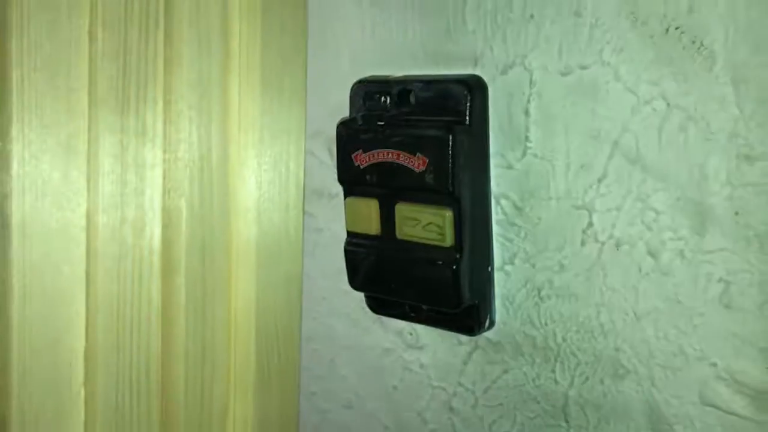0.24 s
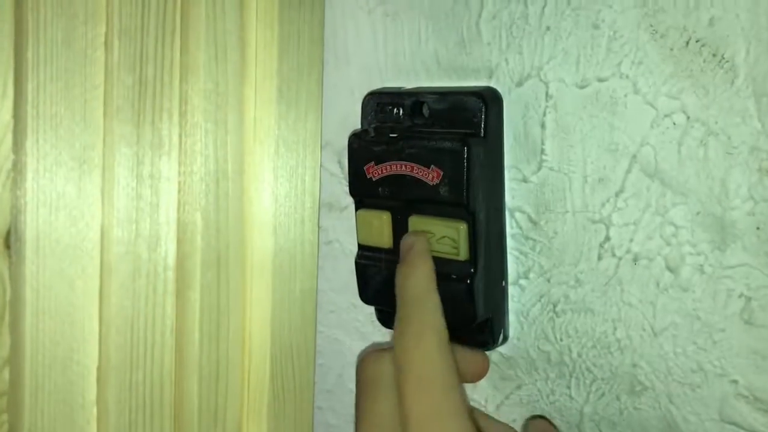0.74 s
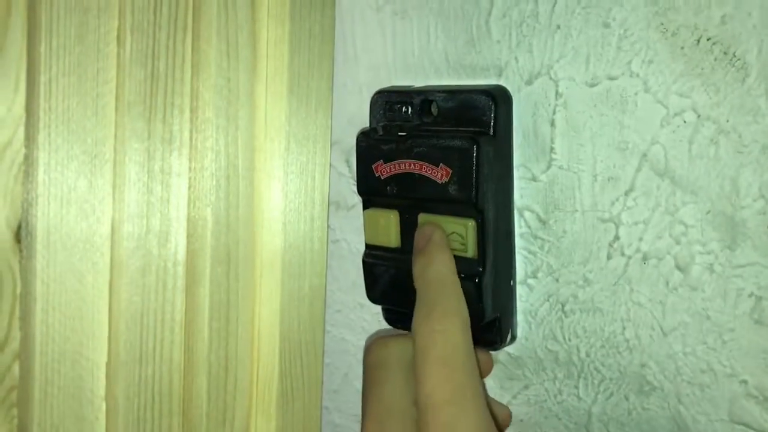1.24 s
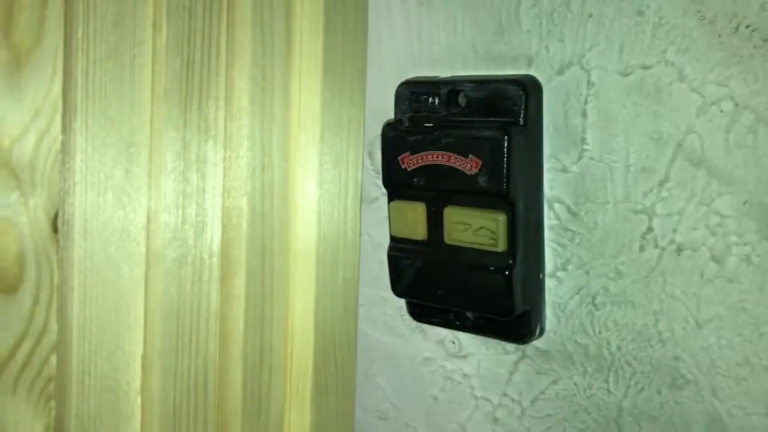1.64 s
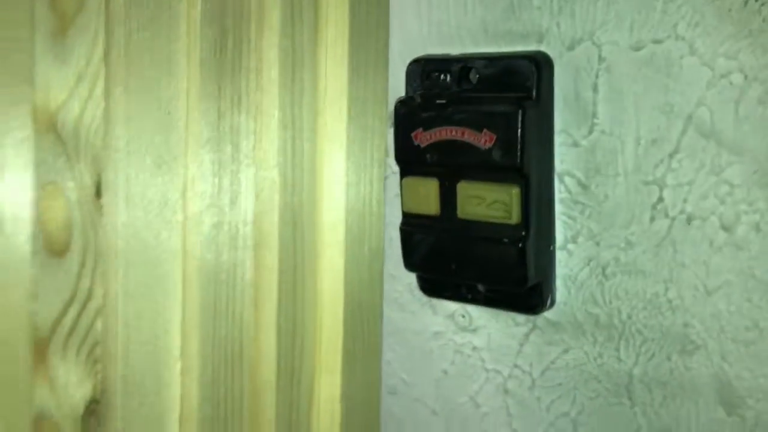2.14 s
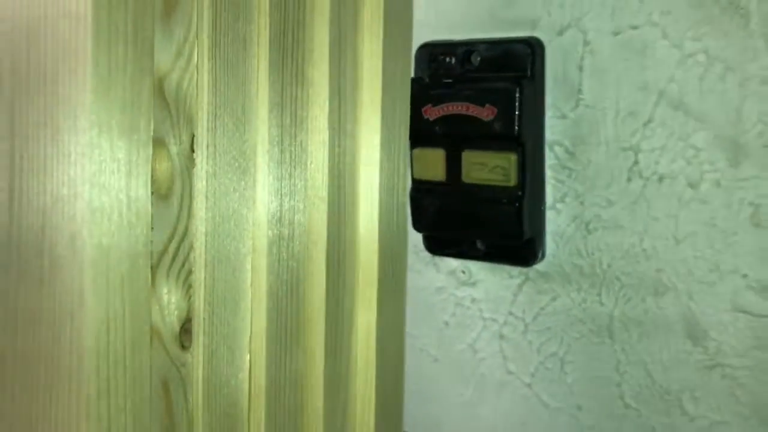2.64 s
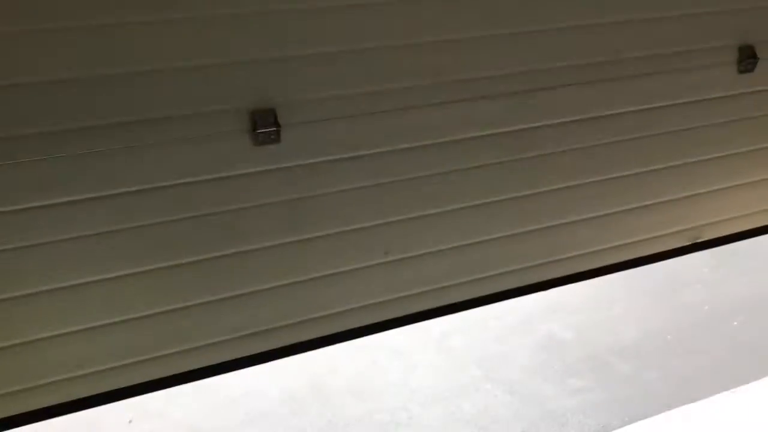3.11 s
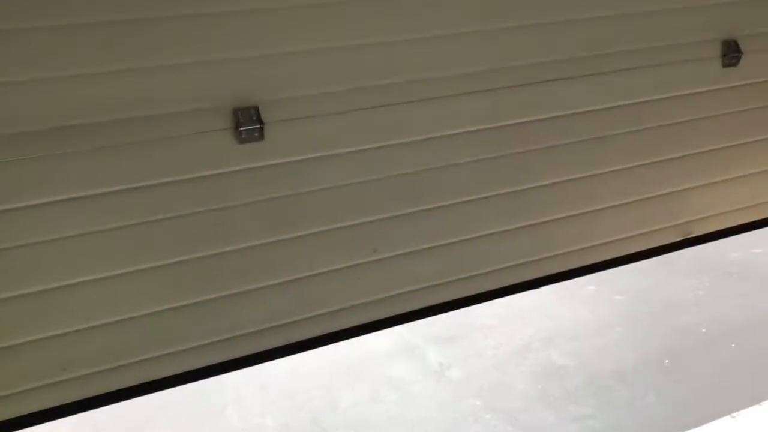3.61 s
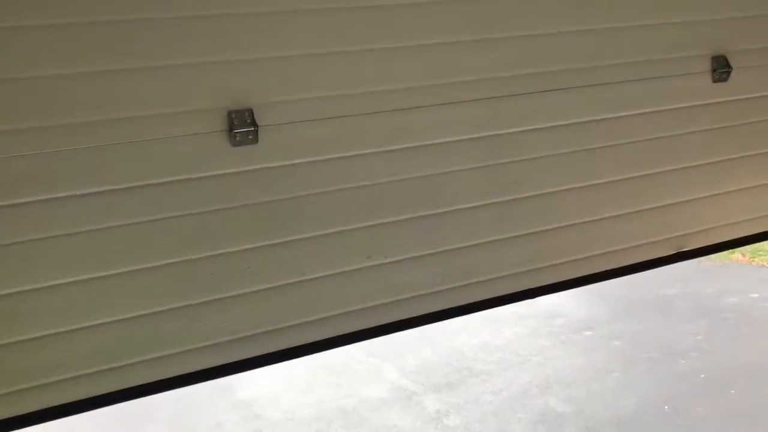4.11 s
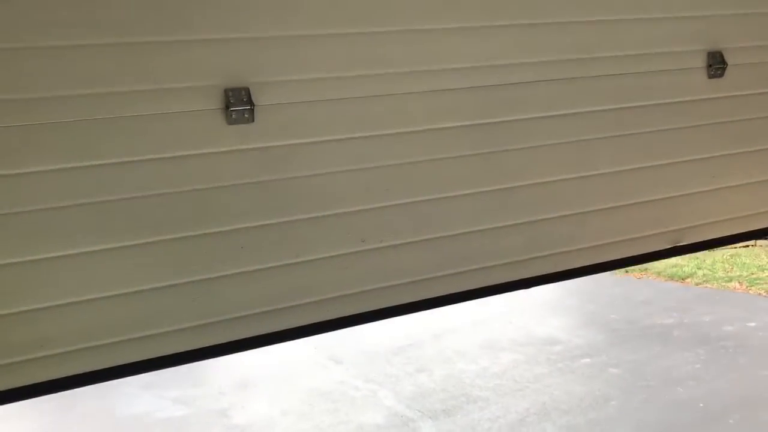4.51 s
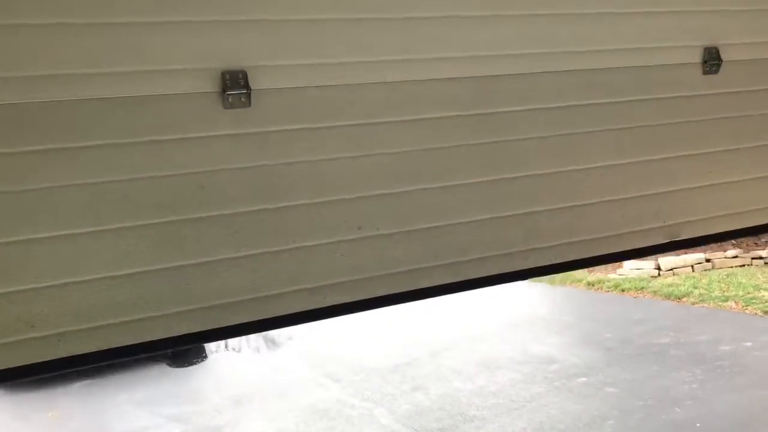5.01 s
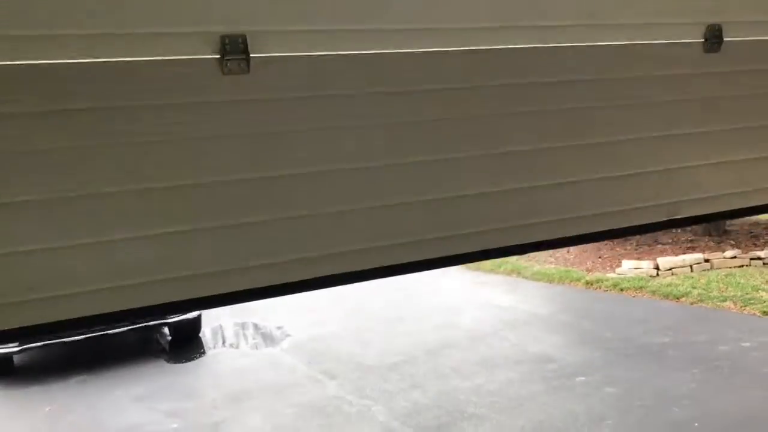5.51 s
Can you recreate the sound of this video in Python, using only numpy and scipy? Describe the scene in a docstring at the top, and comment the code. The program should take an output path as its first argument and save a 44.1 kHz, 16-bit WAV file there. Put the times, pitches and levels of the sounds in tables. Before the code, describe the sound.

In a quiet garage, a hand and clothing rustle faintly close to the microphone. A plastic wall button clicks and an electric opener starts humming. The door jerks into motion with dull blows and ringing metal clanks, then rumbles along its track while the chain slaps. Its hollow drone slowly grows as panels knock, the frame thumps and hinges clack, echoing off the bare walls.

```python
"""In a quiet, bare garage a hand settles on the wall; cloth brushes and small ticks sound close by.
A wall button clicks and an electric opener starts, its motor humming at twice the mains frequency.
The sectional door jerks, its rollers rumble along the track, and its hollow drone swells, settles and
grows steadily louder. The drive clanks, sets the steel rail ringing and slaps as it takes the load.
Then panels knock, the frame thumps and hinges clack, each impact reverberating in the room."""
import sys
import numpy as np
from scipy import signal
from scipy.io import wavfile

SR = 44100
rng = np.random.default_rng(int(sys.argv[2]) if len(sys.argv) > 2 else 0)


def transcribe(u):
    """Save the signal u as a 16-bit wav file named by the first command-line argument.

    u: samples, shape (n,) or (channels, n), limited to [-1, 1]; the rate is SR.
    q: integer samples, one column per channel.
    """
    v = np.clip(np.atleast_2d(u).T, -1, 1)
    q = np.round(v * 32767).astype(np.int16)
    wavfile.write(sys.argv[1], SR, q)


N = 253575
TIME = np.arange(N) / SR
START_S = 1.365  # the motor switches on

# modes of the steel rail: f/Hz, level/dB, T60/s
RAIL_MODES = [(2799, -10, .45), (3094, -6, .5), (3212, -9, .45), (3558, -7, .4), (3682, -9, .4),
              (5440, -6, .25), (5497, -3, .4), (5555, -4, .25), (6008, -7, .25), (9975, -7, .4),
              (10318, -6, .4), (10611, -5, .4), (10853, -5, .4), (11035, -3, .4), (11613, -2, .4),
              (11700, -4, .35), (11970, -5, .4), (12668, -6, .35)]
# jolts as the door leaves the floor and as sections tip over: t/s, level/dB
DOOR_JOLTS = [(1.52, -37), (2.3, -48), (4.28, -57)]


def amp(db):
    """Amplitude ratio of a level in decibels."""
    return 10 ** (np.asarray(db) / 20)


def unit(x):
    """Normalisation to an rms of 1."""
    return x / np.sqrt(np.mean(x ** 2) + 1e-20)


def since(s):
    """Time elapsed since s; zero before it."""
    return np.maximum(TIME - s, 0)


def add(mix, s, sound):
    """Superposition of a sound that begins at time s."""
    part = mix[max(round(s * SR), 0):][:len(sound)]
    part += sound[:len(part)]


def log_interp(points, hz):
    """Interpolation on a logarithmic frequency axis."""
    f, value = np.transpose(points)
    return np.interp(np.log(hz + 1), np.log(f + 1), value)


def colour(x, spectrum, tilt_db=0, size=8192):
    """Minimum-phase filtering by a spectrum, tilted by tilt_db per octave about 2 kHz."""
    hz = abs(np.fft.fftfreq(size, 1 / SR))
    db = log_interp(spectrum, hz) + tilt_db * np.log2(np.maximum(hz, 200) / 2000)
    log_response = np.conj(signal.hilbert(np.log(amp(db))))
    taps = np.fft.ifft(np.exp(log_response)).real
    return signal.fftconvolve(x, taps[:size // 2])[:len(x)]


def noise(spectrum):
    """Gaussian noise of rms 1 with the given spectral shape."""
    return unit(colour(rng.standard_normal(N), spectrum))


def drift(rate_hz, oversample=8):
    """Random modulation of rms 1, band-limited to rate_hz."""
    count = int(2 * rate_hz * N / SR) + 8
    points = signal.resample(rng.standard_normal(count), count * oversample)
    return unit(np.interp(TIME * 2 * rate_hz * oversample, np.arange(len(points)), points))


def swell(s, db, rise_s, decay_s):
    """Transient envelope: vibration builds up after a jolt at time s and decays exponentially."""
    return amp(db) * (1 - np.exp(-since(s) / rise_s)) * np.exp(-since(s) / decay_s)


def ring(modes, t):
    """Free vibration: a sum of damped sinusoids."""
    return sum(amp(db - 60 * t / t60) * np.sin(2 * np.pi * hz * t) for hz, db, t60 in modes)


def shaken(modes):
    """Forced vibration: a random force sustains the modes."""
    return unit(signal.fftconvolve(rng.standard_normal(N), ring(modes, TIME[:SR]))[:N])


def reverberation(x, size=32768):
    """Diffuse reflections from bare walls, new on each call; absorption takes the treble first."""
    decay_times = [(100, 0.59), (500, 0.61), (2000, 0.48), (5000, 0.43), (10000, 0.41), (16000, 0.36)]  # reverberation time of the garage: f/Hz, T60/s
    hz, t, bands = signal.stft(rng.standard_normal(size), SR, nperseg=256)
    decay = amp(-60 * t / log_interp(decay_times, hz)[:, None])
    tail = signal.istft(bands * decay, SR, nperseg=256)[1][:size]
    return signal.fftconvolve(x, tail / np.linalg.norm(tail))[:len(x)]


def room_air(level_db=-63):
    """Ambient noise: steady, and strongest in the deep bass."""
    spectrum = [(12, -55), (20, -11.5), (32, -10.5), (134, -18.5), (154, -23), (976, -33), (2260, -38.5),
                (3440, -40), (4540, -41), (10800, -42), (16000, -40)]  # still garage: f/Hz, relative level/dB
    return amp(level_db) * noise(spectrum)


def friction(strokes, spectrum, grain_db):
    """Sliding friction: grainy noise under Gaussian envelopes."""
    envelope = sum(amp(db) * np.exp(-((TIME - s) / half) ** 2 / 2) for s, db, half in strokes)
    grains = rng.standard_normal(N) * amp(grain_db * drift(310))
    return envelope * unit(colour(grains, spectrum))


def hand():
    """Friction of a hand settling against the wall under the button."""
    rubs = [(.14, -68.5, 0.078), (.375, -62, 0.054), (.452, -62.5, 0.027), (.625, -66, 0.02)]  # strokes: centre t/s, level/dB, half-width/s
    spectrum = [(40, 3), (150, 1.5), (320, 0.5), (600, -4), (1300, -5.5), (2200, -13.5), (4500, -17.5),
                (8000, -32)]  # hand on wall: f/Hz, relative level/dB
    return friction(rubs, spectrum, grain_db=2.0)


def cloth():
    """Friction of cloth close to the listener, heard as direct sound only."""
    brushes = [(0.153, -48.5, 0.0065), (.38, -62.5, 0.091), (.67, -68, 0.016), (1.21, -70.5, .025),
               (2.235, -49, 0.023), (2.302, -45.5, 0.019), (2.392, -52.5, 0.037), (3.099, -40, 0.038),
               (3.255, -54, 0.015), (3.554, -51, 0.08), (3.74, -53.5, 0.079)]  # strokes: centre t/s, level/dB, half-width/s
    spectrum = [(150, 9.5), (1000, -10), (2500, -8), (4500, -7.5), (6500, -6.5), (9000, 0.5), (12500, 5.5),
                (14500, -5), (16000, 1)]  # rubbing fabric: f/Hz, relative level/dB
    return friction(brushes, spectrum, grain_db=1.5)


def ticks(decay_s=0.0022):
    """Tiny bright transients, so near that the direct sound dominates."""
    onsets = [(0.154, -38.5), (.567, -58), (0.609, -59), (2.098, -43), (2.124, -47), (2.354, -44),
              (3.053, -33), (3.292, -47), (3.587, -43), (4.165, -37), (4.192, -44), (4.216, -39.5),
              (4.243, -47)]  # dry ticks: t/s, level/dB
    spectrum = [(2000, -23), (3900, -39), (4600, -1), (5800, -23), (8000, -9.5), (10500, 5), (13000, -2),
                (16000, -19)]  # one tick: f/Hz, relative level/dB
    envelope, t = np.zeros(N), TIME[:SR // 20]
    for s, db in onsets:
        add(envelope, s, amp(db) * np.exp(-t / decay_s))
    return envelope * noise(spectrum)


def button(press_s=1.26, room_db=-14, rise_s=0.00031):
    """Impulse response of a hollow plastic button: heavily damped modes make a click."""
    modes = [(665, -58, 0.04), (995, -37.5, 0.021), (1100, -51, 0.023), (1590, -49, 0.048),
             (2440, -46, .025), (2720, -64, 0.033), (3960, -57, .018), (6000, -58, 0.014)]  # wall button: f/Hz, level/dB, T60/s
    click, t = np.zeros(N), TIME[:SR // 5]
    add(click, press_s, ring(modes, t) * (1 - np.exp(-t / rise_s)))
    return click + amp(room_db) * reverberation(click)


def motor(hum_hz=120, run_up_s=0.16):
    """Magnetic force peaks twice per mains cycle: a hum, thin and buzzy at first, then full."""
    harmonics = [-2.5, -20.5, -22, -26.5, -28, -22, -40]  # hum partials from the fundamental up: relative level/dB
    age = since(START_S)
    hum, strain = np.zeros(N), np.exp(-age / run_up_s)
    for k, db in enumerate(harmonics, 1):
        depth = 0.081 + 0.048 * age if k == 1 else 0.29  # the fundamental wavers more and more
        strain_db = (k > 1) * 11 * strain  # overtones stand out under the starting load
        octave_db = (k == 2) * (-7.5 + 3.5 * age)  # the octave starts weak and grows steadily louder
        waver = 1 + depth * (drift(3.4) + 1j * drift(3.5))
        partial = np.exp(2j * np.pi * (k * hum_hz * TIME + rng.random()))
        hum += amp(db + strain_db + octave_db) * (waver * partial).real
    return np.sqrt(2) * amp(-40.5 - 22 * strain) * hum


def rolling_door(bumps_per_s=800, grain_db=3.5):
    """Roughness excitation: rollers cross small bumps in the track, and the panels boom."""
    levels = [(1.45, -50), (2.0, -51.5), (2.8, -51), (3.9, -49.5), (4.35, -49.5), (5.1, -47.5), (5.6, -51)]  # rolling, stronger as sections enter the bend: t/s, level/dB
    roller_spectrum = [(200, -17), (400, -3.5), (540, 0), (750, -2), (1100, -2.5), (1700, -8.5),
                       (2400, -12), (3500, -19), (6000, -24.5), (11500, -26), (16000, -39)]  # rollers on the track: f/Hz, relative level/dB
    boom_spectrum = [(40, -26), (66, 4), (90, -0.5), (125, 4), (170, 7), (235, -3), (320, 2), (420, -11),
                     (600, -12), (1200, -42)]  # booming panels: f/Hz, relative level/dB
    sizes = rng.standard_normal(N) * amp(grain_db * np.minimum(rng.exponential(1, N), 4))
    bumps = sizes * (rng.random(N) < bumps_per_s / SR)
    bumps = 0.5 * bumps + reverberation(bumps)
    rolling = amp(np.interp(TIME, *np.transpose(levels)) + 0.1 * drift(4.6))
    rollers = unit(colour(bumps, roller_spectrum)) * rolling
    lift_off = swell(DOOR_JOLTS[0][0], db=-37, rise_s=0.059, decay_s=0.1)
    boom = noise(boom_spectrum) * (amp(-0.5) * rolling + lift_off)
    return rollers + boom


def section_drone(growth_db_per_s=2.5, settle_s=0.28):
    """Resonance of hollow sections: a low drone swells at the first jerk, then grows steadily."""
    modes = [(64, 1.5, 0.71), (225.7, -3, 0.3), (237.4, 0.5, 0.67), (256, -6, 0.35), (318.8, -2.5, 0.35),
             (493, -10, 0.25), (538, -11.5, 0.12), (575.5, -11, 0.23), (644, -23, 0.69), (719, -10.5, 0.3)]  # door sections: f/Hz, relative level/dB, T60/s
    age = since(START_S)
    first_jerk = amp(-47) * np.exp(-age / settle_s)
    return shaken(modes) * (amp(-56 + growth_db_per_s * age) + first_jerk)


def frame_shudder(steady_db=-63.5):
    """Damped low-frequency sway of the frame, renewed by each jolt."""
    spectrum = [(5, -7), (16, 14), (30, -22), (45, -5), (70, -5.5), (140, -40)]  # swaying frame: f/Hz, relative level/dB
    sway = sum(swell(s, db, rise_s=0.049, decay_s=0.58) for s, db in DOOR_JOLTS)
    return noise(spectrum) * (amp(steady_db) + sway)


def singing_rail(taut_s=1.72, drive_hz=5640, fall_db_per_octave=2):
    """Forced resonance: the rail sings as the drive snaps taut, then fades as the load eases."""
    modes = [(hz, db - fall_db_per_octave * abs(np.log2(hz / drive_hz)), t60)
             for hz, db, t60 in RAIL_MODES]
    easing = amp(-64.5 - 4 * since(START_S))
    snap = swell(taut_s, db=-46, rise_s=0.037, decay_s=0.09)
    return (easing + snap) * shaken(modes)


def impacts(events, spectrum, direct, rail_db, rise_s, contacts_per_s=8000, places=4, size=32768):
    """Contact chatter: loose parts strike in bursts of impulses, and the rail rings in sympathy."""
    out, t = np.zeros(N), TIME[:size]
    rail = amp(rail_db) * ring(RAIL_MODES, t)
    for s, db, tilt_db, rattle_s in events:
        force = (1 - np.exp(-t / rise_s)) * np.exp(-(t / rattle_s) ** 2)
        contacts = force * rng.choice([-1, 1], size) * (rng.random(size) < contacts_per_s / SR)
        place = rng.integers(0, places, size)  # each place of contact has its own reflections
        reflections = sum(reverberation(contacts * (place == k)) for k in range(places))
        rattle = colour(direct * contacts + reflections, spectrum, tilt_db)
        rattle /= np.std(rattle[:round(0.04 * SR)])  # the first 40 ms set the level
        add(out, s, amp(db) * (rattle + rail * np.minimum(t / rattle_s, 1)))
    return out


def door_jerks():
    """Impact on a large body: the door radiates dull blows as it starts to move."""
    jerks = [(1.369, -53.5, 4, 0.04), (1.414, -39.5, 0.5, 0.033), (1.452, -42, 0.5, 0.02),
             (1.489, -44.5, 4.5, 0.029), (1.598, -44.5, -1.5, 0.046), (1.675, -48, 2, 0.023)]  # blows: t/s, level/dB, tilt/(dB/octave), rattle/s
    spectrum = [(60, -24), (150, 1.5), (300, -4), (600, 2.5), (1000, -7), (2000, -13), (4000, -22),
                (6500, -28.5), (11000, -25), (16000, -31)]  # whole door: f/Hz, relative level/dB
    return impacts(jerks, spectrum, direct=0.68, rail_db=-36, rise_s=0.0038)


def arm_clanks():
    """Structural coupling: the arm clanks under load and rings the rail strongly."""
    clanks = [(1.615, -34.5, -0.33, 0.023), (1.655, -45.5, -0.12, 0.022), (1.713, -38, -0.82, 0.017),
              (1.843, -34.5, -0.24, 0.024), (1.95, -52.5, 0.68, 0.076)]  # blows: t/s, level/dB, tilt/(dB/octave), rattle/s
    spectrum = [(100, -12), (500, -6.5), (1000, -1.5), (2200, -6), (3400, -1.5), (4800, -10.5), (7000, -9),
                (10000, -3), (12500, 1), (14500, -3), (16000, -8)]  # drive arm: f/Hz, relative level/dB
    return impacts(clanks, spectrum, direct=0.47, rail_db=-9, rise_s=0.0017)


def chain_slaps():
    """Clustered impacts of the chain as it takes the load."""
    slaps = [(2.152, -43.5, -0.47, 0.052), (2.383, -47, 0.2, 0.028), (2.649, -45, 0.3, 0.032),
             (2.874, -44.5, -0.7, 0.02)]  # blows: t/s, level/dB, tilt/(dB/octave), rattle/s
    spectrum = [(100, 17), (300, 12.5), (1000, 5.5), (2000, 4), (3300, -4.5), (4400, 3.5), (6500, -9.5),
                (9000, -8.5), (11800, 2), (16000, -11)]  # drive chain: f/Hz, relative level/dB
    return impacts(slaps, spectrum, direct=0.43, rail_db=-36, rise_s=0.0035)


def panel_knocks():
    """Plate radiation: struck panels knock in the middle frequencies."""
    knocks = [(3.318, -38, 1.9, 0.024), (3.665, -48.5, 1.5, 0.031), (3.964, -55.5, 1, 0.14),
              (4.12, -44.5, -2, 0.0065), (4.52, -45.5, -3.5, 0.015), (4.739, -45.5, 0, 0.025),
              (5.323, -48, 0, 0.0053), (5.399, -38.5, -1.3, 0.0087)]  # blows: t/s, level/dB, tilt/(dB/octave), rattle/s
    spectrum = [(100, -8.5), (400, 3.5), (700, 2.5), (1000, 1), (1350, 1), (1750, 1.5), (2500, -5.5),
                (3700, -17), (6500, -16.5), (8500, -15), (11300, -12.5), (13000, -20), (16000, -24)]  # door panel: f/Hz, relative level/dB
    return impacts(knocks, spectrum, direct=0.66, rail_db=-44, rise_s=0.00076)


def frame_thumps():
    """Low-frequency response of the frame to slowly rising impacts."""
    thumps = [(4.19, -42.5, 0, 0.02), (4.252, -38.5, 0, 0.028), (4.278, -43, 0, 0.013),
              (4.945, -44, 0, 0.032)]  # blows: t/s, level/dB, tilt/(dB/octave), rattle/s
    spectrum = [(50, -7), (150, 5.5), (310, 1.5), (450, -8), (900, -11.5), (2500, -44), (8000, -50)]  # frame: f/Hz, relative level/dB
    return impacts(thumps, spectrum, direct=0.94, rail_db=-27, rise_s=0.0061)


def hinge_clacks():
    """Brief, hard contacts in the hinges radiate over a broad band."""
    clacks = [(4.292, -52, 2.5, 0.0069), (4.353, -43.5, 4, .006), (4.38, -47, 3.5, 0.018),
              (4.475, -51.5, 0, 0.0079), (4.669, -43.5, -5, 0.0061), (4.697, -51, -0.5, 0.0035),
              (4.75, -46, -0.5, 0.02), (4.895, -51, 2, 0.0055), (4.941, -49.5, 5, 0.0048),
              (4.962, -41, 3.5, 0.0098)]  # blows: t/s, level/dB, tilt/(dB/octave), rattle/s
    spectrum = [(200, 6), (1000, 7), (2800, 2.5), (4300, -0.5), (5600, -2), (7000, -2.5), (9000, -3),
                (11600, -1), (14000, -7), (16000, -9)]  # hinge: f/Hz, relative level/dB
    return impacts(clacks, spectrum, direct=0.71, rail_db=-21, rise_s=0.00079)


def scene(spin_up_s=0.054):
    """Superposition of the quiet garage, the nearby sounds, the opener and the door."""
    air = room_air()
    near = cloth() + hand() + ticks() + button()
    running = np.clip(since(START_S) / spin_up_s, 0, 1) ** 2
    machine = running * (motor() + rolling_door() + section_drone() + frame_shudder() + singing_rail())
    drive = arm_clanks() + chain_slaps() + door_jerks()
    joints = panel_knocks() + hinge_clacks() + frame_thumps()
    return (air + near + machine + drive + joints)[None]


def record(dry, fade_in_s=0.051, fade_out_s=0.023, cutoff_hz=15900):
    """Gain and band limit: the level fades in, dips briefly and fades out; a low-pass follows."""
    spans = [(0.027, 3.028), (3.03, 5.738)]  # audible spans either side of the dip: start t/s, end t/s
    gain = sum(np.clip(np.minimum((TIME - start) / fade_in_s, (end - TIME) / fade_out_s), 0, 1)
               for start, end in spans)
    low_pass = signal.firwin(511, cutoff_hz, window=("kaiser", 9), fs=SR)
    return signal.oaconvolve(dry * gain, low_pass[None], "same")


dry = scene()
out = record(dry)
transcribe(out)
```